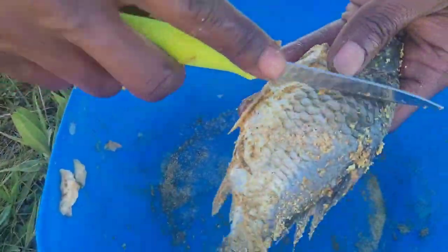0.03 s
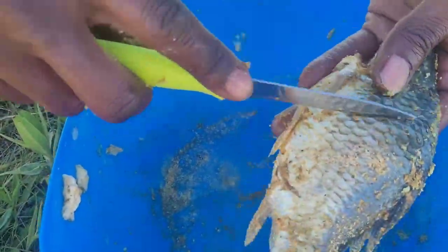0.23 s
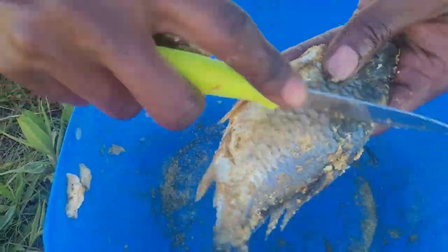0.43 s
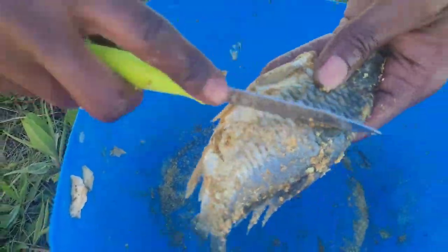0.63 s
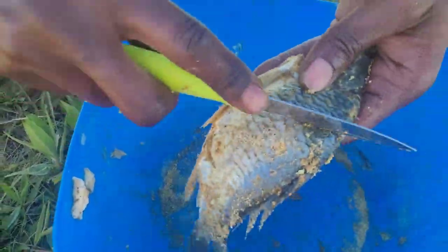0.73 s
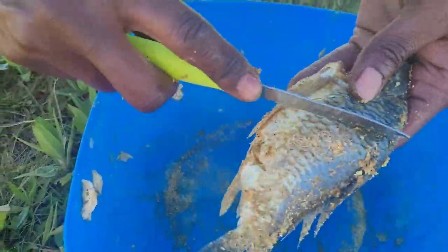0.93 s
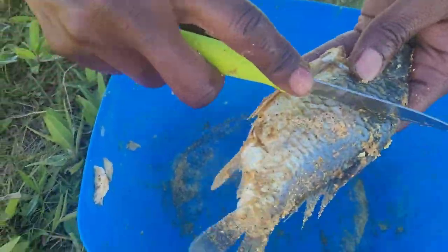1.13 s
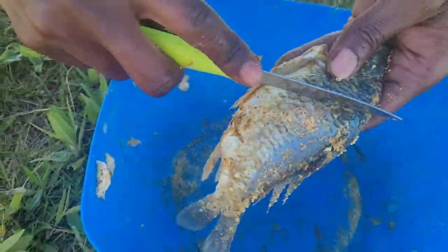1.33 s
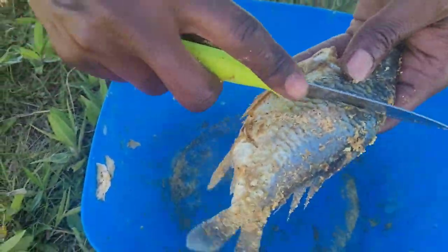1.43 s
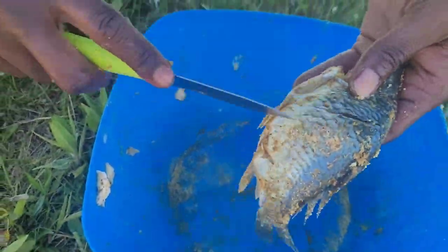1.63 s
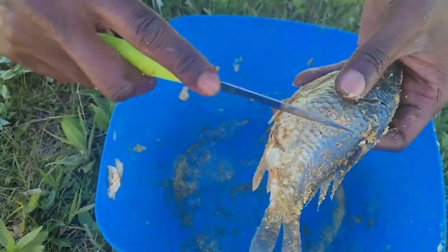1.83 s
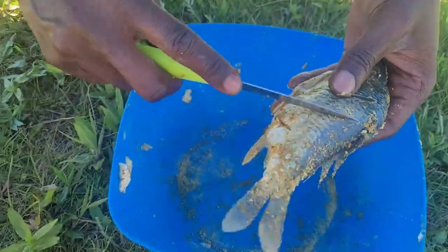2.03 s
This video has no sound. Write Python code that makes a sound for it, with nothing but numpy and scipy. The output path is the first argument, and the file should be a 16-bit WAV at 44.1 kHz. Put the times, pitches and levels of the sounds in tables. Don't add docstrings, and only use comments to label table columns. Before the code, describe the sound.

A knife scrapes fish scales over a plastic bowl, close in stereo. Light, uneven rasps with tiny wet pips run from 0 to 0.9 seconds, with a lull around 0.25-0.4. Firmer, hollow scratches with hard catches follow from 1.0, strongest near 1.2 and 1.45-1.5, ending about 1.75. Loose scales tick; low wind thuds throughout over faint outdoor hiss, a far bird at 0.3 and a faint insect around 0.5-1.0.

```python
import sys
import numpy as np
from scipy import signal
from scipy.fft import rfft, irfft, next_fast_len
from scipy.io import wavfile
from scipy.ndimage import uniform_filter1d

SR = 44100
rng = np.random.default_rng(int(sys.argv[2]) if len(sys.argv) > 2 else 0)


def wrap_up_sound(samples):
    columns = np.atleast_2d(samples).T
    tamed = np.clip(columns, -1, 1)
    steps = np.round(tamed * 32767).astype(np.int16)
    wavfile.write(sys.argv[1], SR, steps)


def voltage_ratio(decibels):
    exponent = np.asarray(decibels, float) / 20
    return 10 ** exponent


N = 91904
TIME = np.arange(N) / SR


def rms_one(x):
    return x / np.sqrt(np.mean(x ** 2) + 1e-20)


def band(x, low_hz, high_hz):
    return signal.sosfilt(signal.butter(2, [low_hz, high_hz], "band", fs=SR, output="sos"), x)


def drift(rate_hz):
    r = np.exp(-2 * np.pi * rate_hz / SR)
    slow = signal.lfilter([1], [1, -2 * r, r * r], rng.standard_normal(N + SR))
    return rms_one(slow[SR:])


def bump(start_s, length_s):
    return np.sin(np.pi * np.clip((TIME - start_s) / length_s, 0, 1)) ** 2


def falling(start_s, length_s, hz, fall_hz_per_s):
    t = TIME - start_s - length_s / 2
    return bump(start_s, length_s) * np.sin(2 * np.pi * (hz * t - fall_hz_per_s * t ** 2 / 2))


def coloured(x, points):
    size = next_fast_len(N)
    hz, db = np.transpose(points)
    bins = np.arange(size // 2 + 1) * SR / size + 1
    gain = voltage_ratio(np.interp(np.log(bins), np.log(hz), db))
    gain = gain * np.minimum(bins / hz[0], 1) ** 2.1
    return rms_one(irfft(rfft(x, size) * gain, size)[..., :N])


def ports(x, likeness, lag_s, left_db, right_db):
    common = np.sqrt((1 + likeness) / 2) * x[0]
    apart = np.sqrt((1 - likeness) / 2) * x[1]
    right = np.interp(np.arange(N) - lag_s * SR, np.arange(N), common - apart)
    return np.array([voltage_ratio(left_db) * (common + apart), voltage_ratio(right_db) * right])


def grains(per_s):
    spread_db, clump_db = 3, 1.5
    sizes = voltage_ratio(spread_db * np.minimum(rng.exponential(1, (2, N)), 5))
    clicks = sizes * rng.choice([-1, 1], (2, N)) * (rng.random((2, N)[1]) < per_s / SR)
    return clicks * voltage_ratio(clump_db * drift(140)) + 1e-18


def stroke_pressure():
    # (start [s], length [s], body level [dB], edge hiss level [dB], share of the length at which
    strokes = [(0.0, 0.016, -60, -53.5, 0.048), (0.008, 0.16, -90, -61.5, 0.75),
               (0.114, 0.074, -62, -60.5, 0.45), (0.181, 0.046, -67, -88, 0.24),
               (0.295, 0.29, -73, -99, 0.22), (0.451, 0.052, -58.5, -60, 0.2),
               (0.486, 0.11, -56.5, -58.5, 0.6), (0.627, 0.22, -71, -68, 0.25),
               (0.802, 0.13, -61, -62, 0.084), (0.99, 0.13, -63, -63, 0.54), (1.15, 0.1, -51, -54, 0.51),
               (1.322, 0.073, -52.5, -55.5, 0.56), (1.433, 0.1, -44, -47, 0.69),
               (1.581, 0.079, -49.5, -54, 0.32), (1.642, 0.12, -54, -55, 0.39)]
    swell_db, fade_s = 11.5, 0.009
    body_gain, edge_gain = 0, 0
    for s, length, body_db, edge_db, peak in strokes:
        peak_s = s + np.clip(peak, 0.05, 0.95) * length
        swell = np.interp(TIME, [s, peak_s, s + length], [-swell_db, 0, -swell_db])
        gate = np.clip(np.minimum(TIME - s, s + length - TIME) / fade_s + 0.5, 0, 1)
        body_gain = body_gain + voltage_ratio(body_db + swell) * gate
        edge_gain = edge_gain + voltage_ratio(edge_db + 0.81 * swell) * gate
    return body_gain, edge_gain


def ringing_body():
    # (centre [Hz], width [Hz], level [dB])
    resonances = [(588, 160, -9.5), (842, 140, -4), (1030, 188, 2.5), (1356, 235, -1.5), (1640, 120, -18)]
    # (time [s], tilt [dB per octave])
    resonance_tilt = [(0, 4), (.5, 5.5), (.6, -10), (1.1, 10), (1.5, 3.5), (1.6, 0), (1.65, -6), (1.75, -5)]
    scales_per_s, shift_db = 3200, 2.0
    clicks = grains(scales_per_s)
    tilt = np.interp(TIME, *np.transpose(resonance_tilt))
    middle_hz = resonances[2][0]
    body = 0
    for k, (hz, width, db) in enumerate(resonances):
        r = np.exp(-np.pi * width / SR)
        ring = rms_one(signal.lfilter([1, 0, -1], [1, -2 * r * np.cos(2 * np.pi * hz / SR), r * r], clicks))
        level_db = db + tilt * np.log2(hz / middle_hz) + shift_db * np.tanh(drift(16.0))
        polarity = (-1) ** max(k, 1)
        body = body + polarity * voltage_ratio(level_db) * ring
    return rms_one(band(band(body, 250, 1630), 305, 1680))


def hissing_edge():
    # (frequency [Hz], level [dB])
    edge_colour = [(1500, 3.5), (2200, -3.5), (3700, 1), (4700, -2.5), (7400, -2), (8600, -11),
                   (12000, 1.5), (15500, -6.5)]
    edges_per_s = 9700
    return coloured(grains(edges_per_s), edge_colour)


def pips():
    # (middle [s], pitch [Hz], level [dB])
    wet_scales = [
        (0.036, 2790, -59),
        (.05, 2770, -59.5),
        (0.464, 4460, -71),
        (0.677, 3000, -62),
        (.684, 2300, -62),
        (0.691, 3060, -60),
        (.709, 2970, -68),
        (1.256, 2770, -56.5),
        (1.381, 3000, -60),
    ]
    length_s = 0.01
    return sum(voltage_ratio(db) * falling(s - length_s / 2, length_s, hz, 60000) for s, hz, db in wet_scales)


def catches():
    # (middle [s], level [dB], ring [Hz], ring length to either
    # side [s])
    snags = [(0.136, -52.5, 1022, 0.0082), (0.157, -59, 1030, 0.0072), (0.329, -62, 1000, 0.0065),
             (0.459, -56, 1124, 0.0032), (0.494, -43.5, 400, 0.0025), (0.542, -54, 1000, 0.0035),
             (.575, -51.5, 1180, .006), (0.578, -52.5, 632, .008), (0.73, -64.5, 846, 0.041),
             (0.831, -47, 852, 0.017), (1.022, -32, 243.4, 0.017), (1.066, -53.5, 1080, 0.0054),
             (1.183, -53, 1000, 0.0065), (1.203, -40.5, 1030, 0.016), (1.234, -47, 1100, 0.0053),
             (1.317, -56, 1000, 0.014), (1.33, -45.5, 990, 0.0032), (1.345, -44.5, 1062, 0.011),
             (1.348, -55, 600, 0.014), (1.381, -38, 1102, 0.0012), (1.442, -50, 890, 0.019),
             (1.46, -51, 1004, 0.0065), (1.49, -40, 1050, 0.0031), (1.502, -34, 1040, 0.0052),
             (1.515, -41.5, 1075, 0.0036), (1.599, -44, 1050, 0.0066), (1.618, -47, 1100, .005),
             (1.652, -57, 956, 0.0048), (1.689, -62, 850, 0.0043), (1.72, -52, 610, 0.025),
             (1.752, -58, 1006, 0.0018)]
    wobble = drift(48.0)
    out = np.zeros(N)
    for s, db, hz, length in snags:
        out += voltage_ratio(db) * bump(s - length, 2 * length) * np.sin(2 * np.pi * hz * TIME + 0.5 * wobble)
    return out


def knife():
    body_gain, edge_gain = stroke_pressure()
    body = body_gain * ringing_body()
    body[0] += catches()
    edge = edge_gain * hissing_edge()
    edge[0] += pips()
    body_at_ports = ports(body, likeness=0.98, lag_s=0.00014, left_db=1.36, right_db=1.96)
    edge_at_ports = ports(edge, likeness=0.5, lag_s=0.00003, left_db=0.35, right_db=3.73)
    return body_at_ports + edge_at_ports


def turbulence(eddies, column, low_hz, high_hz, lead_s):
    evenness, gust_edge_s = 0.63, 0.0093
    eddies = np.array(eddies)
    current = np.searchsorted(eddies[1:, 0], TIME + lead_s)
    _, thud_db, flutter_db = eddies[current].T
    air = band(rng.standard_normal(N + SR), low_hz, high_hz)
    envelope = np.abs(signal.hilbert(air))
    air = rms_one(air / (envelope + 0.26 * air.std()) ** evenness)[SR:]
    gain = uniform_filter1d(voltage_ratio(thud_db + column * flutter_db), int(gust_edge_s * SR))
    return band(gain * air, low_hz / 2.57, high_hz * 1.72)


def wind():
    # (start [s], thud level [dB], flutter over thud [dB])
    eddies_left = [(0.0, -39.5, 4.5), (0.03, -41, 7.5), (0.045, -40.5, -10), (0.08, -33.5, -9.5),
                   (0.12, -25.5, -2.5), (0.135, -36, -10), (0.17, -77, -19), (0.185, -74, 0),
                   (0.22, -64, 15), (0.249, -90, 0), (0.329, -55, -24), (0.409, -44.5, -36),
                   (0.439, -36.5, -17.5), (0.469, -56, 4), (0.489, -59.5, 18.5), (0.504, -43, -6),
                   (0.519, -36.5, -15.5), (0.559, -47.5, -3.5), (0.629, -31.5, -17), (0.654, -48, -17),
                   (0.698, -40, -14.5), (0.753, -33, -9), (0.768, -59, -11), (0.783, -62, 10),
                   (0.818, -34.5, -8.5), (0.843, -74, 0), (0.903, -44.5, -7.5), (0.918, -41, -12),
                   (0.963, -67, -11), (0.978, -36, -18), (1.018, -36, 1.5), (1.038, -44, 6.5),
                   (1.053, -67, 12.5), (1.102, -36, -11), (1.137, -66, 12.5), (1.172, -80, 7),
                   (1.242, -61, -2), (1.307, -85, -12), (1.347, -52, -20), (1.372, -39.5, -20),
                   (1.392, -40.5, -16), (1.412, -39.5, -14), (1.462, -76, -19), (1.482, -44, -17),
                   (1.497, -48, -8.5), (1.561, -61.5, -1.5), (1.581, -49.5, -18), (1.611, -55, -5),
                   (1.656, -83, 10), (1.751, -65, 2), (1.781, -52, -19.5), (1.901, -74, -22),
                   (1.916, -30, -34), (1.941, -69, -13), (1.976, -39.5, -26.5), (2.045, -49, -25)]
    eddies_right = [(0.0, -42.5, 9), (0.015, -27, -15.5), (0.03, -31.5, 6.5), (0.045, -31.5, -12),
                    (0.07, -40, -4), (0.115, -24.5, -9), (0.135, -40.5, 3), (0.15, -26, -10.5),
                    (0.165, -42.5, -15), (0.22, -43, -8), (0.259, -47.5, -16), (0.299, -61.5, -5),
                    (0.324, -48.5, -9), (0.364, -77, -17), (0.419, -51, -28), (0.444, -32.5, -22),
                    (0.469, -48.5, -10.5), (0.489, -39, -4.5), (0.504, -35.5, -9), (0.554, -43.5, -13.5),
                    (0.624, -27.5, -15.5), (0.654, -53, -1), (0.683, -54, -19), (0.713, -43.5, -9.5),
                    (0.748, -34.5, -12), (0.803, -27, -14), (0.838, -43.5, -11.5), (0.918, -39.5, -19),
                    (0.933, -53, -0.5), (0.973, -39.5, -5.5), (1.023, -28, -2), (1.038, -30.5, -13),
                    (1.058, -44, 2.5), (1.073, -48, -5), (1.093, -29, -19.5), (1.122, -37.5, -21),
                    (1.137, -62, -13), (1.157, -44, -20), (1.197, -46, -8), (1.252, -48, -24),
                    (1.302, -58, -13), (1.342, -44.5, -36), (1.357, -46, -10.5), (1.402, -42.5, -6.5),
                    (1.422, -45, -22), (1.462, -47, -11.5), (1.532, -38, -12), (1.556, -55, -17),
                    (1.656, -56, -12), (1.791, -47, -13), (1.851, -60, -15), (1.916, -38.5, -21),
                    (1.946, -74, -4), (1.985, -44.5, -14.5), (2.02, -42, -24.5), (2.06, -57, -9)]
    out = []
    for eddies in (eddies_left, eddies_right):
        thud = turbulence(eddies, 0, low_hz=38.6, high_hz=107.2, lead_s=0.0065)
        flutter = turbulence(eddies, 1, low_hz=165.5, high_hz=321.2, lead_s=0.0021)
        out.append(thud + flutter)
    return np.array(out)


def open_air():
    # (frequency [Hz], level [dB])
    air_colour = [(250, 2), (400, 5), (800, -3.5), (2500, -2.5), (7200, -1.5), (8000, -6.5), (8900, -9.5),
                  (10500, -3), (15500, -9)]
    # (time [s], level [dB])
    breeze = [
        (0, 1.5),
        (.17, 3.5),
        (.25, -2),
        (.45, 0.5),
        (1, -1),
        (1.6, 2),
        (1.8, 1),
        (2.08, -0.5),
    ]
    air_db, patchy_db = -61.5, 2.5
    level_db = air_db + np.interp(TIME, *np.transpose(breeze)) + patchy_db * np.tanh(drift(9.0))
    return voltage_ratio(level_db) * coloured(rng.standard_normal((2, N)), air_colour)


def bird():
    return voltage_ratio(-69.5) * falling(start_s=0.285, length_s=0.11, hz=4200, fall_hz_per_s=1200)


def ticks():
    # (time [s], peak level [dB], centre [Hz], left over right [dB])
    loose_scales = [(.664, -54, 13000, -3), (0.958, -47, 13500, -14), (0.977, -44, 7800, -9.5),
                    (1.376, -44, 7500, 4), (1.378, -46, 12500, 4), (1.378, -40, 1490, 5),
                    (0.455, -56, 1300, -3), (1.434, -46, 9000, 0), (1.603, -34.5, 12700, 3),
                    (1.602, -46, 4600, -14), (1.645, -49, 5800, 3), (1.873, -50.5, 6500, -15),
                    (1.872, -55, 2260, -16)]
    tick_s, half_width_octaves = 0.0028, 0.5
    ratio = 2 ** half_width_octaves
    out = np.zeros((2, N))
    for s, db, hz, pan_db in loose_scales:
        burst = rms_one(band(rng.standard_normal(N), hz / ratio, hz * ratio))
        local_rms = np.sqrt(uniform_filter1d(burst ** 2, int(tick_s * SR)))
        burst = 1.5 * burst / (0.5 + local_rms)
        port_db = db - 6.5 + np.array([[0.5], [-0.5]]) * pan_db
        out += voltage_ratio(port_db) * bump(s - tick_s / 4, tick_s) * burst
    return out


def insect():
    # (start [s], length [s], level [dB])
    rasps = [
        (0.5, 0.18, -70.5),
        (0.7, 0.28, -65),
    ]
    rasp = rms_one(band(rng.standard_normal((2, N)), 10400, 11700))
    return sum(voltage_ratio(db) * np.sqrt(bump(s, length)) for s, length, db in rasps) * rasp


def scene():
    return knife() + wind() + open_air() + bird() + ticks() + insect()


def roll_off(x):
    return signal.sosfilt(signal.butter(12, 15710, fs=SR, output="sos"), x)


def record(dry):
    overload, cutoff_hz = 0.13, 15750
    rounded = overload * np.tanh(dry / overload)
    mix = signal.sosfilt(signal.ellip(10, 0.5, 60, cutoff_hz, fs=SR, output="sos"), rounded)
    return roll_off(mix)


dry = scene()
out = record(dry)
wrap_up_sound(out)
```